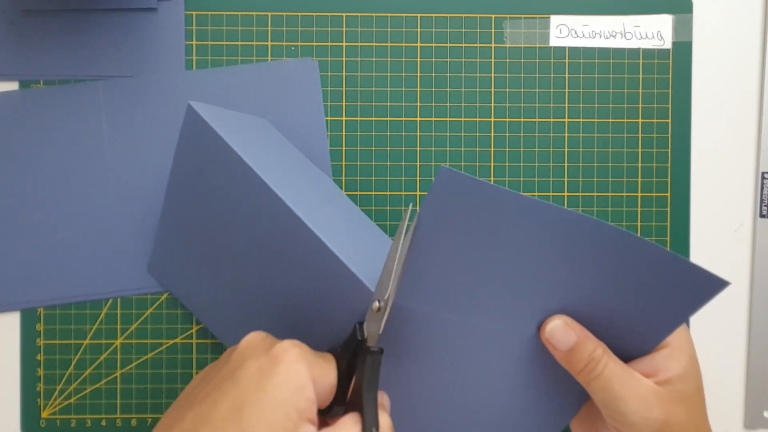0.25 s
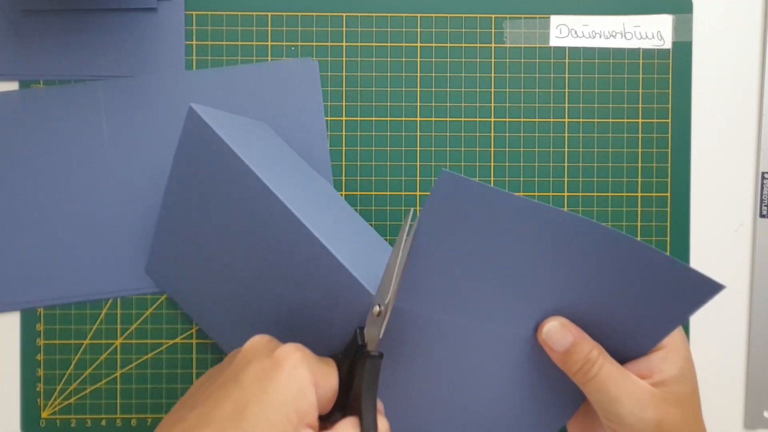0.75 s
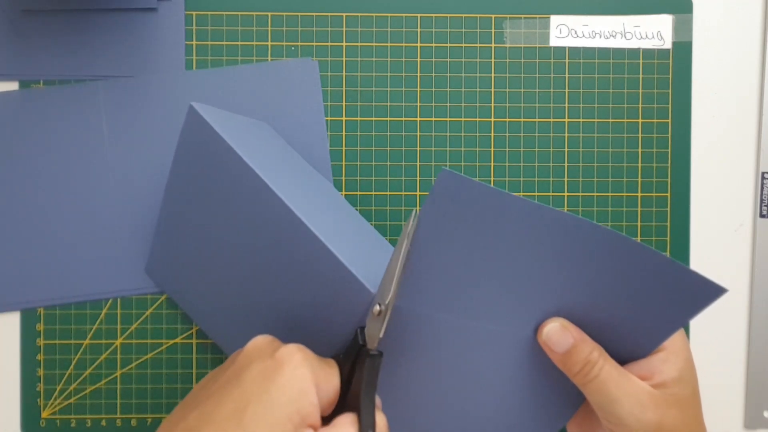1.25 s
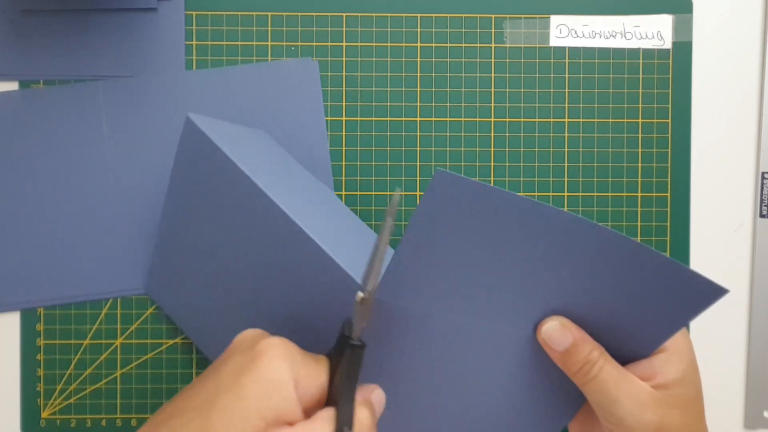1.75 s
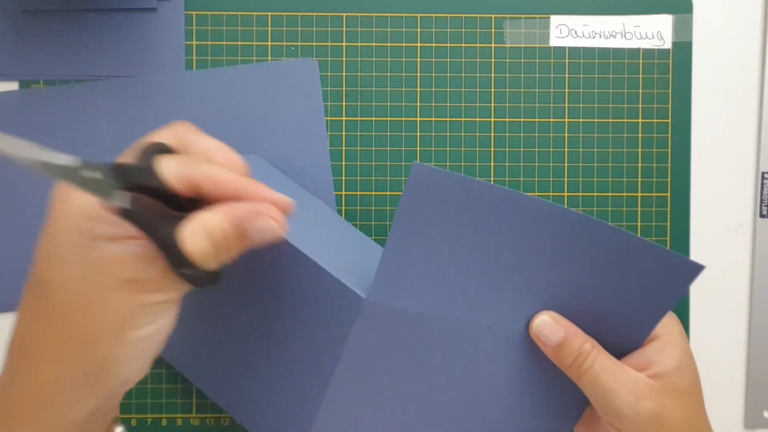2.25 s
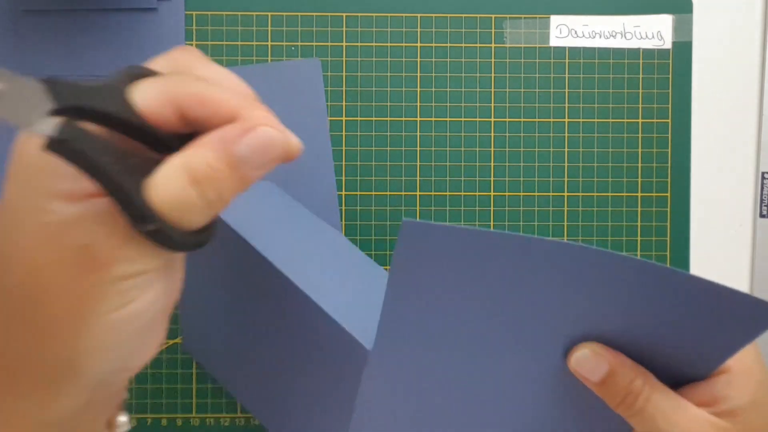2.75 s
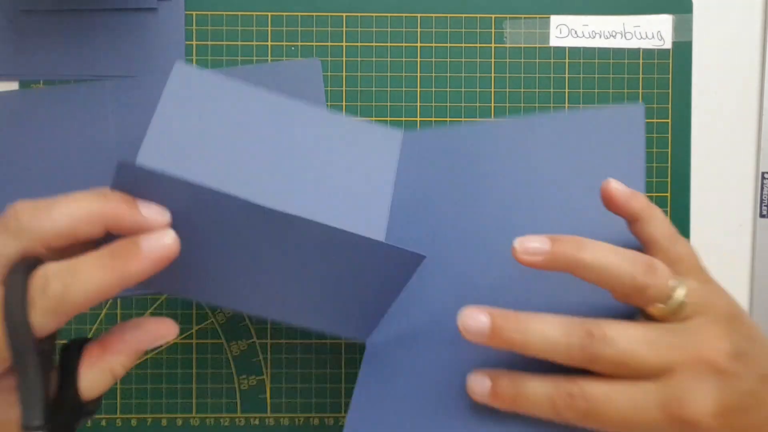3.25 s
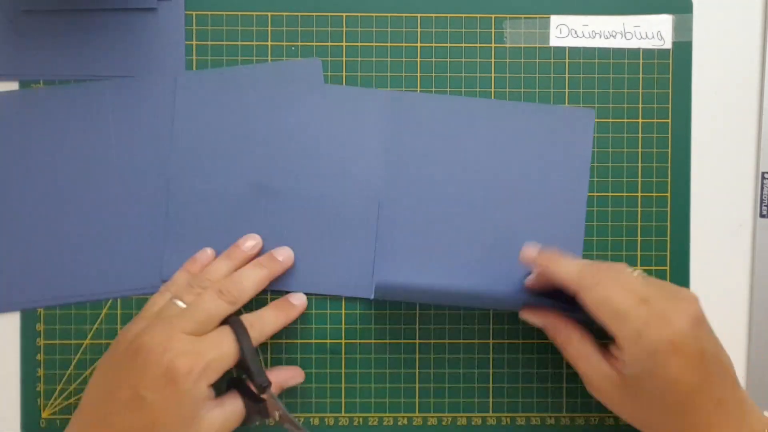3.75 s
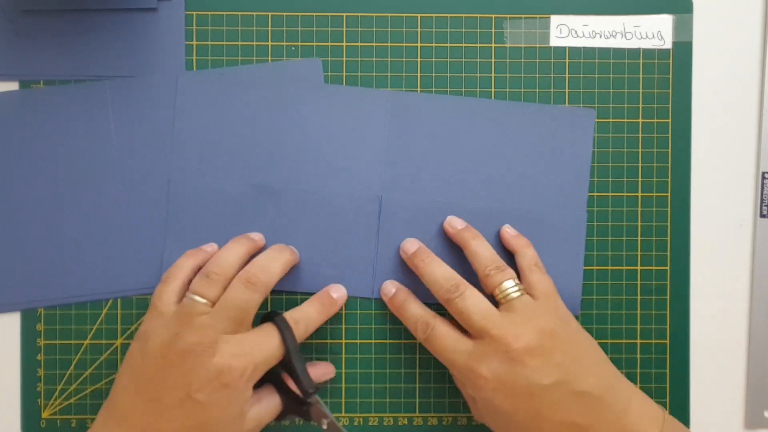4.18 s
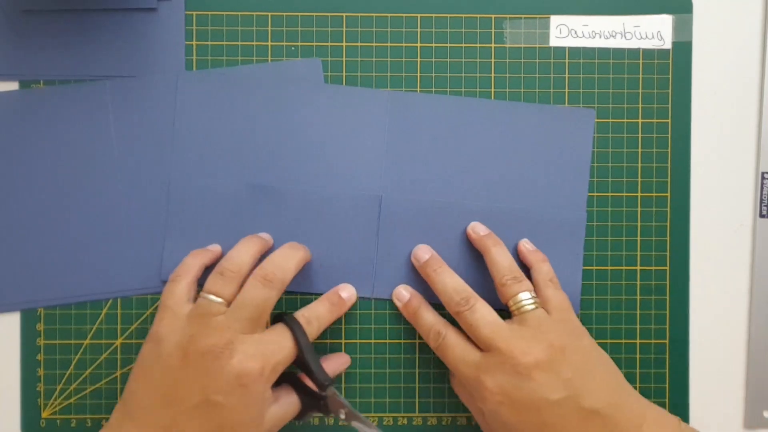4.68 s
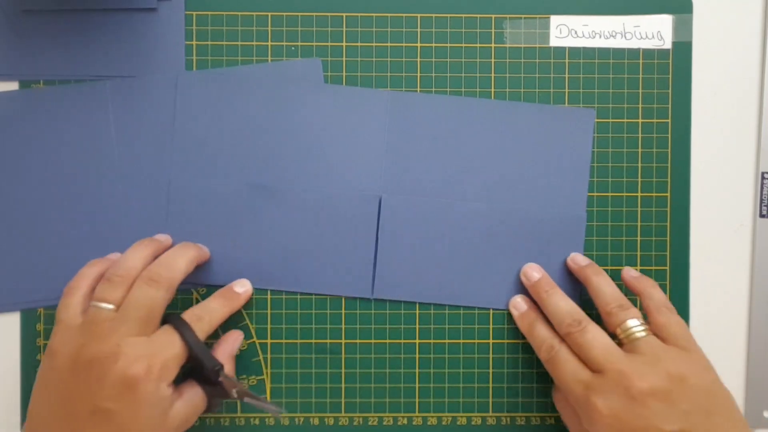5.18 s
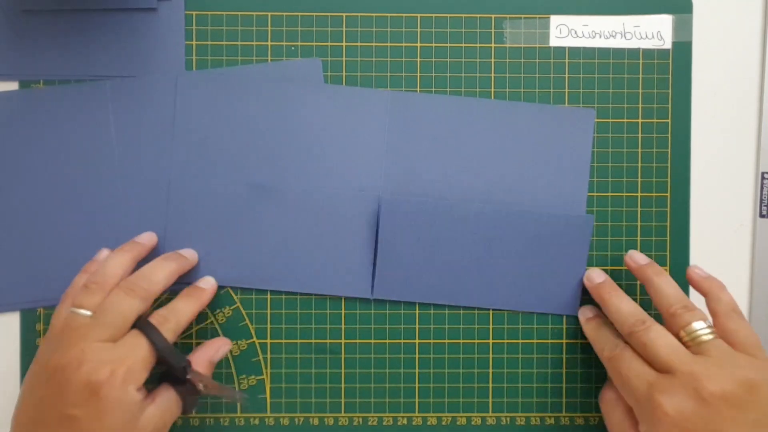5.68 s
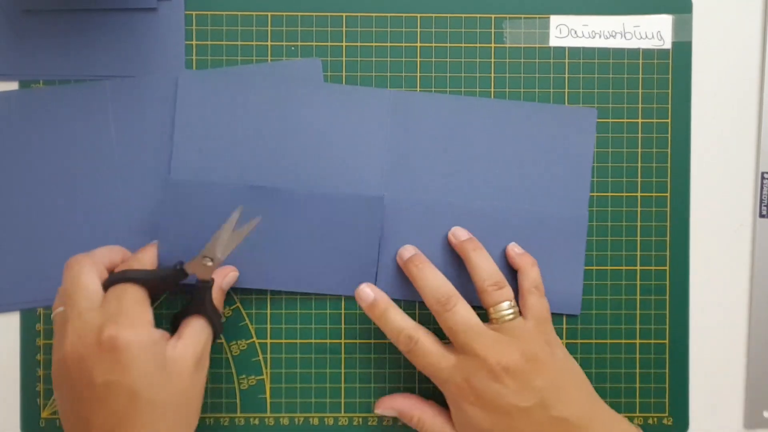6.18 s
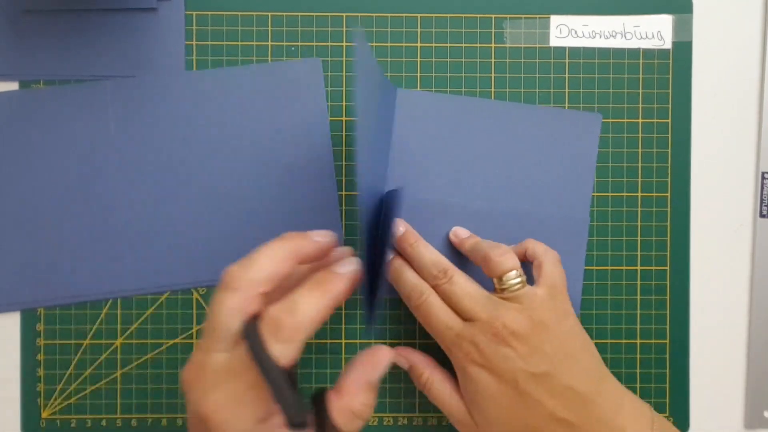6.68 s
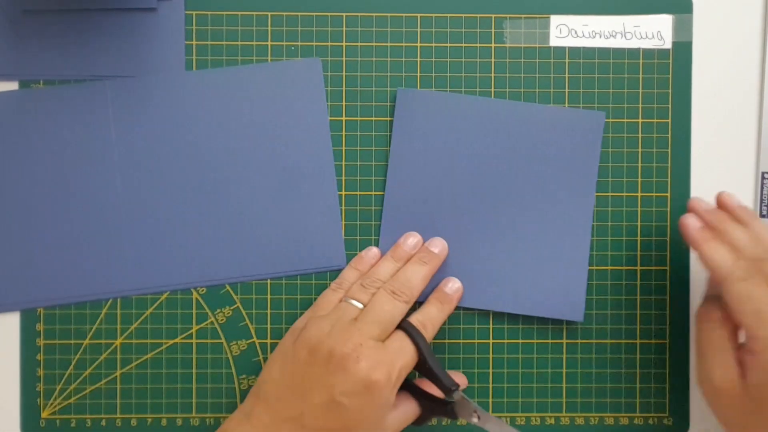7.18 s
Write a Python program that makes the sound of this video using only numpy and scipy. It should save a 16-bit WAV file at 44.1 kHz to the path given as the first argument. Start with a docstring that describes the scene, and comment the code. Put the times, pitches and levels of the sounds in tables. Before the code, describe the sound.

Close on a craft table in a small quiet room, scissors make faint fibrous crunches through stiff card, growing firmer before the blades click shut. Light steel grating and paper flutter follow, then the card slaps loudly onto the mat. Hands slide, flick and press it with dry rustles and soft thumps, and near the end a metal edge clinks as the sheet is turned over.

```python
"""A craft table in a small room: scissors finish a cut through folded cardstock, fibre by fibre.
The blades click shut and are swung aside. The card is unfolded, slaps down on the cutting mat,
and is slid, flicked and pressed flat by hand; near the end a metal edge clinks as the sheet is folded over.
Breaks and rubbing are shaped noise, the slap is one pulse; card, steel and table ring as damped resonances.
Knocks, breaks and catching grains are heard with close reflections and the room's short echo;
fine rubbing noise and the steel's ring stay dry."""
import sys
import numpy as np
from scipy import signal
from scipy.fft import rfft, irfft, next_fast_len
from scipy.io import wavfile
from scipy.ndimage import map_coordinates

SR = 44100
rng = np.random.default_rng(int(sys.argv[2]) if len(sys.argv) > 2 else 0)


def generate_wav(sig):
    """Save sig (samples, or channels by samples) to the path in sys.argv[1] as 16-bit PCM at SR."""
    pcm = np.round(np.clip(np.atleast_2d(sig).T, -1, 1) * 32767).astype(np.int16)
    wavfile.write(sys.argv[1], SR, pcm)


N = 327657  # samples in the whole scene
SIZE = 16384  # samples in one short sound or response
HZ = np.fft.rfftfreq(SIZE, 1 / SR)
T = np.arange(SIZE) / SR
LEAD_IN = 0.03  # seconds from the start of a short sound to its strongest moment

# resonances of the sheet: f/Hz, width/Hz, level/dB
SHEET_MODES = [(870, 26, -15), (1015, 64, 0.5), (1142, 24, -5), (1309, 22, 4), (1426, 32, 0),
               (1700, 80, -5.5), (1897, 40, -4), (2063, 39, 2), (2314, 71, 2.5), (2730, 38, 3)]
# resonances of the cut flap of card: f/Hz, width/Hz, level/dB
FLAP_MODES = [(790, 127, 4.5), (1045, 340, 4.5), (1878, 96, 4.5), (2240, 100, -1)]
# colour of the cutting sound: f/Hz, level/dB
CUT_COLOUR = [(88, -16), (150, -20), (226, -11.5), (483, -8), (699, -14.5), (817, -12), (1380, -16),
              (1930, -10.5), (3020, -15.5), (4540, -18), (9340, -24), (13000, -27.5), (15800, -38)]


def amp(db):
    """Turn decibels into a gain."""
    return 10 ** (np.asarray(db) / 20)


def unit(x):
    """Scale a signal to an average (rms) strength of 1."""
    return x / np.sqrt(np.mean(x ** 2) + 1e-20)


def along(points, hz):
    """Read a curve of (frequency, value) points on a log frequency axis."""
    f, v = np.transpose(points)
    return np.interp(np.log(hz + 1), np.log(f + 1), v)


def level(points):
    """Gain along (time, dB) points, silent outside them."""
    return amp(np.interp(np.arange(N) / SR, *np.transpose(points), left=-np.inf, right=-np.inf))


def filtered(x, response):
    """Multiply the spectrum of x by a response that depends on frequency."""
    n = x.shape[-1]
    m = next_fast_len(n + SIZE)
    spectrum = rfft(x, m) * response(np.fft.rfftfreq(m, 1 / SR))
    return irfft(spectrum, m)[..., :n]


def causal(gain):
    """The minimum-phase response with this gain: it reacts at once and never before its cause."""
    c = irfft(np.log(np.maximum(gain, 1e-6)))
    c[1:SIZE // 2] *= 2
    c[SIZE // 2 + 1:] = 0
    return np.exp(rfft(c))


def resonances(modes, f):
    """Response of damped modes, each a peak with its own centre, width and level."""
    return sum(amp(db) * 1j * f * w / (c * c - f * f + 1j * f * w) for c, w, db in modes)


def brightened(tone, treble_db):
    """A colour with its treble tilted up or down."""
    share = along([(2000, 0.015), (5000, 0.59), (14000, 0.96)], HZ)  # how much of the tilt each frequency gets
    return amp(along(tone, HZ) + treble_db * share)


def wobble(rate):
    """A smooth random curve through this many random points a second."""
    knots = rng.standard_normal(int(N * rate / SR) + 4)
    return map_coordinates(knots, [np.arange(N) * rate / SR])


def spread(pair):
    """Two unrelated signals become left and right, alike in the bass."""
    # likeness of left and right, 1 = identical: f/Hz, likeness
    likeness = [(60, 0.93), (250, 0.82), (700, 0.53), (1400, 0.34), (3000, 0.089), (15000, 0)]

    def mid_and_side(hz):
        angle = np.arccos(np.clip(along(likeness, hz), -1, 1)) / 2
        return np.array([np.cos(angle), np.sin(angle)])

    mid, side = filtered(pair, mid_and_side)
    return np.array([mid + side, mid - side])


def add(track, s, sound):
    """Mix a sound in at time s."""
    part = track[:, max(round(s * SR), 0):][:, :sound.shape[-1]]
    part += sound[..., :part.shape[1]]


def room(early_db, tail_db, early_t60=0.025, left_lead=.00013):
    """Response of one path to both ears: direct sound (left first), desk reflections, echo from the walls."""
    # time the echo takes to fall 60 dB: f/Hz, t60/s
    echo_times = [(120, 0.3), (1200, 0.14), (5000, 0.13), (15000, 0.094)]
    early = spread(rng.standard_normal((2, SIZE)) ** 3) * amp(-60 * T / early_t60) * (T > .0007)
    hz, t, z = signal.stft(spread(rng.standard_normal((2, SIZE))), SR, nperseg=256)
    decay = amp(-60 * t / along(echo_times, hz)[:, None])
    tail = signal.istft(z * decay, SR, nperseg=256)[1][:, :SIZE]
    tail = tail * (1 - np.exp(-T / 0.0074))  # the echo builds up gradually
    direct = np.exp(-2j * np.pi * HZ * np.array([[0], [round(left_lead * SR) / SR]]))
    return direct + rfft(amp(early_db) * unit(early) + amp(tail_db) * unit(tail)) / np.sqrt(SIZE)


def crackle(colour, length, density, scuff_db, rise, break_db):
    """A grainy burst of energy 1: it swells quickly to one main break, then dies away."""
    length = np.clip(length, .001, .03)
    since = T - LEAD_IN
    envelope = np.exp(-np.abs(since) / np.where(since < 0, rise * length, length))
    grains = (rng.random(SIZE) < density / SR) * rng.uniform(-2.07, 2.2, SIZE)
    burst = (grains + amp(scuff_db) * rng.standard_normal(SIZE)) * envelope
    burst[round(LEAD_IN * SR)] += amp(break_db)
    spectrum = rfft(burst) * causal(colour)
    return spectrum / np.linalg.norm(irfft(spectrum))


def friction(tone, grain_db, density, ring_db, modes=SHEET_MODES):
    """Rubbing of rms 1: dry fine noise and catching grains in the room, coloured by a tone curve and resonances."""
    grains = (rng.random(N) < density / SR) * rng.standard_normal(N)
    path = irfft(room(early_db=2.0, tail_db=-4.0))
    grains = signal.fftconvolve(unit(grains)[None], path, axes=1)[:, :N]
    drive = spread(rng.standard_normal((2, N))) + amp(grain_db) * grains
    return unit(filtered(drive, lambda hz: amp(along(tone, hz)) * (1 + amp(ring_db) * resonances(modes, hz))))


def ambience(rms_db=-62.5):
    """Quiet steady air of the room: coloured noise, more alike left and right in the bass."""
    # colour of the air: f/Hz, level/dB
    air_colour = [(12, -33), (20, 0.5), (95, -6), (130, -7.5), (230, -10), (305, -7.5), (443, -22.5),
                  (996, -18.5), (1470, -24.5), (1650, -21), (2120, -27.5), (2300, -24), (3700, -30),
                  (9300, -40), (13700, -32.5), (15800, -31)]
    air = spread(rng.standard_normal((2, N)))
    return amp(rms_db) * unit(filtered(air, lambda hz: amp(along(air_colour, hz))))


def thumps(gain_db=16, width=1.0):
    """Hands and sheet land softly and ring the table; the shorter the contact, the higher the modes it reaches."""
    # landings: t/s, level/dB before the gain, centre of the knock f/Hz
    landings = [(1.883, -38, 101), (2.428, -35.5, 121), (2.548, -38.5, 200), (2.618, -35, 143),
                (2.63, -41, 148), (3.212, -36.5, 128), (3.238, -31, 101), (3.397, -23.5, 245),
                (3.411, -30.5, 85), (3.438, -28.5, 114), (3.804, -27.5, 109), (3.876, -37, 160),
                (3.934, -34, 483), (3.973, -37, 150), (4.136, -37, 159), (4.672, -44.5, 177),
                (4.707, -43.5, 182), (5.439, -40.5, 195), (5.973, -38, 230), (6.324, -36.5, 96),
                (6.424, -41, 175), (6.698, -39.5, 152), (7.13, -36.5, 310), (7.145, -33, 146)]
    # resonances of the table top and mat: f/Hz, width/Hz, level/dB
    table_modes = [(56, 6.5, 8), (80.5, 32, 4), (117, 17, -2.5), (134.7, 10, 4.5), (194, 20, 1),
                   (230, 52, -11.5), (283, 33, 1.5), (372, 26, 0), (516, 57, -32.5)]
    out = np.zeros((2, N))
    for s, db, hz in landings:
        contact = resonances([(hz, width * hz, 0)], HZ) ** 2
        push = resonances(table_modes, HZ) * contact
        push = push / np.linalg.norm(irfft(push))
        add(out, s - .003, amp(db + gain_db) * irfft(push * room(early_db=-11.0, tail_db=-9.0)))
    return out


def strokes():
    """Flutter, rub and hiss gains: every stroke swells as the hand speeds up and fades as it slows."""
    # pushes and turns of the card: fastest t/s, speeding up/s, slowing down/s, rub level/dB, hiss over rub/dB
    pushes = [(1.781, 0.074, 0.15, -61.5, -3), (1.96, 0.22, 0.1, -70, -14), (2.15, 0.092, 0.34, -73.5, 6.5),
              (2.38, 0.075, 0.087, -64, 5.5), (2.64, 0.063, 0.033, -56, 2.5),
              (2.8, 0.52, 0.52, -64.5, -7.5), (3.23, 0.043, 0.097, -52.5, -3.5),
              (3.47, 0.064, 0.06, -45.5, 0), (3.62, 0.079, 0.11, -58.5, -4.5), (3.81, 0.18, 0.14, -54, 3.5),
              (4.15, 0.055, 0.094, -54.5, 2), (4.339, 0.018, 0.11, -67, 2), (4.73, 0.082, 0.74, -60.5, 0.5),
              (5.021, 0.23, 0.28, -65, 4), (5.44, 0.19, 0.2, -61, -6), (5.729, 0.044, 0.079, -59, -4.5),
              (6.11, 0.25, 0.27, -58, -7), (6.35, 0.099, 0.41, -65, -1), (6.87, 0.088, 0.15, -65, -4),
              (7.11, 0.25, 0.09, -57.5, 7.5)]
    fade_db, roundness = 8, 1.68  # drop one speeding-up or slowing-down time from the peak; shape of the swell
    flutter_db, flutter_per_hiss = -6.5, -0.82  # a sheet lying flat hisses, a lifted one flutters instead
    t = np.arange(N) / SR
    power = np.zeros((3, N))
    for s, rise, fall, db, hiss_db in pushes:
        away = np.abs((t - s) / np.where(t < s, rise, fall))
        swell = amp(db - np.minimum(fade_db * away ** roundness, 100))
        shares = amp([[flutter_db + flutter_per_hiss * hiss_db], [0], [hiss_db]])
        power += (shares * swell) ** 2
    return np.sqrt(power)


def sliding():
    """The card drags over the mat under uneven pressure, catches now and then, and flutters as it bends."""
    # colours of the three layers: f/Hz, level/dB
    flutter_colour = [(26, -45), (45, -3), (113, -9), (231, -12.5), (297, -7), (443, -14), (600, -12.5),
                      (780, -33), (1320, -120)]
    rub_colour = [(240, -62.5), (400, -3.5), (722, 0.5), (1010, -3), (1230, 2), (1480, -0.5), (3130, -3.5),
                  (3380, -8.5), (3660, -2), (4200, -13), (5460, -28.5), (9240, -120)]
    hiss_colour = [(1940, -18.5), (3300, -3.5), (3640, -8.5), (4180, -3), (7150, -6.5), (8050, -5),
                   (9540, -10), (15200, -11), (15800, -28)]
    catches_per_s, catch_db, catch_s = 22, 0.5, 0.026  # random catches: rate, swell, dying-away time
    flutter, rub, hiss = strokes()
    grip = np.sqrt(rub / rub.max())  # firm strokes catch harder
    starts = 1. * (rng.random(N) < catches_per_s / SR)
    catches = signal.fftconvolve(starts, np.exp(-T / catch_s))[:N]
    pressure_db = 1.1 * wobble(45) + catch_db * grip * catches
    flutter = flutter * amp(pressure_db) * friction(flutter_colour, grain_db=-12.0, density=15, ring_db=-6.0)
    rub = rub * amp(pressure_db) * friction(rub_colour, grain_db=-3, density=250, ring_db=-2)
    hiss = hiss * amp(pressure_db / 2) * friction(hiss_colour, grain_db=-10.5, density=450, ring_db=-26.0)
    return flutter + rub + hiss


def scuffs(gain_db=-3, smooth_db=-25, slips_per_s=500):
    """An edge stutters over the paper's grain; its pitch glides as the free length of card changes."""
    # edges and fingertips scraping: strongest t/s, level/dB before the gain, pitch f/Hz,
    # glide/(octaves per s), band width/pitch, length/s
    scrapes = [(2.37, -46.5, 760, -6, 1.7, 0.024), (2.521, -58, 475, -2, 1.3, 0.15),
               (2.646, -58.5, 850, 2, 0.53, 0.022), (3.006, -51, 920, -2, 0.84, 0.021),
               (3.587, -47, 2500, 8, 0.48, 0.047), (4.103, -43.5, 2820, -5, 0.19, 0.011),
               (4.148, -47, 2380, -4, 0.78, 0.033), (5.018, -64, 2220, -1, 0.22, 0.18),
               (5.149, -64, 1325, 0, 0.03, 0.28), (6.029, -49, 1800, -11, 0.73, 0.023),
               (6.098, -49.5, 1790, -3, 0.41, 0.023), (6.284, -54, 1780, 6, 0.38, 0.039),
               (6.427, -58.5, 3130, 4, 0.33, 0.032), (6.605, -58, 3730, 34, 0.91, 0.031),
               (7.122, -47, 1960, 0, 0.15, 0.028)]
    out = np.zeros((2, N))
    t = np.arange(SR) / SR - .5
    for s, db, hz, glide, width, length in scrapes:
        slips = (rng.random(SR) < slips_per_s / SR) * rng.standard_normal(SR)
        slips = slips + amp(smooth_db) * rng.standard_normal(SR)
        f, when, z = signal.stft(slips, SR, nperseg=512)
        centre = hz * 2 ** (glide * np.clip(when - .5, -2 * length, 2 * length))
        band = np.abs(resonances([(centre, width * centre, 0)], f[:, None])) / np.sqrt(centre)
        rasp = unit(signal.istft(z * band, nperseg=512)[1][:SR]) * np.exp(-(t / length) ** 2)
        path = irfft(room(early_db=3.0, tail_db=-5.0))
        add(out, s - .5, amp(db + gain_db) * signal.fftconvolve(rasp[None], path, axes=1))
    return out


def clink(crack_db=19, left_db=2.0):
    """Steel touches down with a bright crack; the hand damps its ring."""
    # metal touching down: t/s, level/dB of the ring (the crack gets a further gain)
    touches = [(7.126, -38)]
    # ringing modes of the steel: f/Hz, level/dB, time to fall 60 dB/s
    steel_modes = [(4900, 4.5, 0.049), (5300, -6.5, 0.049), (8130, -3, 0.18), (9900, -17, 0.18)]
    # colour of the crack: f/Hz, level/dB
    crack_colour = [(1000, -24), (4000, -24), (5400, 1), (9000, -1), (12500, 15), (15800, -8)]
    out = np.zeros((2, N))
    for s, db in touches:
        crack = crackle(amp(along(crack_colour, HZ)), length=0.002, density=1700, scuff_db=-9,
                        rise=0.45, break_db=7)
        add(out, s - LEAD_IN, amp(db + crack_db) * irfft(crack * room(early_db=8.5, tail_db=2)))
        for hz, mode_db, t60 in steel_modes:
            drift = np.cumsum(rng.normal(0, .12, (2, SIZE)), axis=1)  # roughens the pure tone
            phase = rng.uniform(0, 2 * np.pi, (2, 1)) + drift
            add(out, s, amp(db + mode_db - 60 * T / t60) * np.sin(2 * np.pi * hz * T + phase))
    return out * amp([[left_db], [-left_db]])


def taps(gain_db=13, width=0.69):
    """A soft contact knocks a panel of card and chatters briefly: a sudden, dull note."""
    # corners and fingertips tapping the loose card: t/s, level/dB before the gain, panel pitch f/Hz
    contacts = [(2.488, -44, 790), (2.547, -42, 950), (2.615, -44.5, 1280), (3.076, -45.5, 1390),
                (3.093, -39, 610), (3.354, -26, 680), (5.299, -43, 1350), (5.377, -29, 185),
                (6.698, -42, 1250)]
    out = np.zeros((2, N))
    for s, db, hz in contacts:
        panel = np.abs(resonances([(hz, width * hz, 0)], HZ)) ** 2
        knock = crackle(panel, length=0.008, density=1500, scuff_db=-20, rise=0.1, break_db=14)
        add(out, s - LEAD_IN, amp(db + gain_db) * irfft(knock * room(early_db=-5.5, tail_db=-11)))
    return out


def flicks(gain_db=8, usual_treble_db=-14, panel_db=13, damping=0.07, bass_share=0.24):
    """Stiff edges catch and let go; each sets its own patch of card ringing, and a small patch gives little bass."""
    # card edges and fingernails striking the sheet: t/s, level/dB before the gain,
    # treble/dB (compared with the usual), length/s (raised to 0.001 if shorter), panel pitch f/Hz
    strikes = [(2.144, -44.5, 2, 0.001, 9200), (2.433, -31.5, -28, 0.0077, 800),
               (2.671, -32.5, -32, 0.0037, 1580), (2.934, -38, -29, 0.012, 1740),
               (3.094, -35, -10, 0.0026, 634), (3.433, -23, -29, 0.0052, 3500),
               (3.618, -28, -16, 0.0054, 3480), (3.797, -18.5, -14, 0.011, 1620),
               (3.874, -20, -29.5, 0.0077, 776), (3.903, -18.5, -22, 0.0041, 4980),
               (3.936, -23, -25, 0.0078, 2700), (3.967, -30.5, -15, 0.011, 573),
               (4.152, -30, -23, 0.0029, 2400), (5.383, -36.5, -45, 0.0017, 1290),
               (5.462, -38, -24, 0.003, 2220), (5.977, -35, -27.5, 0.005, 1550),
               (6.008, -22.5, -28.5, 0.00085, 2020), (6.044, -34, -32, 0.001, 1890),
               (6.0672, -24, -28, 0.001, 2620), (6.077, -29.5, -32, 0.002, 1710),
               (6.34, -39, -30, 0.0033, 1640), (6.699, -29.5, -20.5, 0.0074, 3560),
               (7.1287, -16.5, -5, 0.0037, 5530), (7.169, -29, -1, 0.0067, 5350)]
    # colour they share: f/Hz, level/dB
    flick_colour = [(120, -28.5), (200, -5.5), (290, 2), (400, -11), (520, -5), (720, -8), (1020, -8),
                    (1470, -8.5), (4160, -6.5), (4990, -8.5), (15800, -20.5)]
    out = np.zeros((2, N))
    for s, db, treble_db, length, hz in strikes:
        panel = np.abs(1.5 + resonances([(hz, damping * hz, panel_db)], HZ))
        bass_loss = HZ / np.hypot(HZ, bass_share * hz)
        colour = brightened(flick_colour, treble_db - usual_treble_db) * panel * bass_loss
        tick = crackle(colour, length, density=1600, scuff_db=-18.5, rise=0.69, break_db=7)
        path = room(early_db=4, tail_db=-3.5, early_t60=0.014)
        add(out, s - LEAD_IN, amp(db + gain_db) * irfft(tick * path))
    return out


def slap(gain_db=5, ring_db=1, left_db=0.7):
    """Air squeezed from under the falling sheet makes one rounded pulse; the sheet rebounds and rings."""
    # the sheet falling flat: t/s, level/dB before the gain
    falls = [(3.3945, -4.5)]
    # its rebounds and nearby surfaces: delay/s, level/dB
    rebounds = [(.0011, -13), (.0026, -15), (.007, -11), (.0104, -14), (.022, -19), (.028, -17)]
    # colour of the pulse: f/Hz, level/dB
    slap_colour = [(60, -33.5), (250, -26), (550, -8.5), (1000, 0.5), (1450, 4), (2200, -2), (2900, -8),
                   (4200, -25), (8000, -32.5), (15800, -43.5)]
    out = np.zeros((2, N))
    pulse = amp(along(slap_colour, HZ)) * np.exp(-2j * np.pi * HZ * LEAD_IN)
    pulse = pulse / np.linalg.norm(irfft(pulse))
    again = 0
    for delay, db in rebounds:
        arrival = delay + rng.normal(0, .00006, (2, 1))  # slightly different left and right
        again = again + amp(db) * np.exp(-2j * np.pi * HZ * arrival)
    ring = amp(ring_db) * resonances(SHEET_MODES, HZ)
    for s, db in falls:
        paths = room(early_db=2.0, tail_db=-1.0, left_lead=0) + again + ring
        add(out, s - LEAD_IN, amp(db + gain_db) * irfft(pulse * paths))
    return out * amp([[left_db], [-left_db]])


def blades(ring_db=25):
    """Out of the card, the scissors click shut, then grate at the pivot as they are swung round; the steel rings."""
    # the scissors swinging round in the fingers: t/s, level/dB
    swing = [(2.04, -76), (2.13, -63), (2.22, -75), (2.27, -54), (2.4, -58), (2.5, -62.5), (2.66, -65),
             (2.72, -72)]
    # the blades falling shut: t/s, level/dB
    closings = [(1.902, -23.5)]
    # resonances of the scissors: f/Hz, width/Hz, level/dB before the ring gain
    blade_modes = [(665, 32, -9), (1026, 30, -9.5), (1530, 31, -3.5), (2875, 59, -7.5), (3737, 59, -4.5),
                   (4760, 60, -10), (5510, 38, -10)]
    out = level(swing) * friction(CUT_COLOUR, grain_db=5, density=130, ring_db=ring_db, modes=blade_modes)
    colour = amp(along(CUT_COLOUR, HZ)) * np.abs(1 + amp(ring_db) * resonances(blade_modes, HZ))
    for s, db in closings:
        click = crackle(colour, length=.003, density=1400, scuff_db=-20, rise=.4, break_db=10)
        add(out, s - LEAD_IN, amp(db) * irfft(click * room(early_db=3.0, tail_db=-23)))
    return out


def blade_drag(ring_db=4):
    """While the cut lasts, the card drags along the blades and crunches softly between them."""
    # loudness of the drag: t/s, level/dB
    drag = [(0, -78), (.06, -63.5), (.15, -58.5), (.2, -67), (.4, -70.5), (.44, -58.5), (.49, -64),
            (.55, -69), (.95, -76), (1.5, -86), (1.75, -59.5)]
    return level(drag) * friction(CUT_COLOUR, grain_db=0, density=220, ring_db=ring_db, modes=FLAP_MODES)


def scissors(gain_db=11, usual_treble_db=-17, crunch_s=0.012):
    """The closing blades shear the card in short, fine-grained crunches that ring the cut flap."""
    # blades breaking through the card: t/s, level/dB before the gain, treble/dB (compared with the usual)
    cuts = [(0.051, -46.5, -17), (0.32, -51.5, -19), (0.483, -47.5, -22), (0.527, -53, -12),
            (0.902, -46, -21), (0.935, -52.5, -13), (0.982, -44.5, -15), (1.006, -44, -12),
            (1.041, -49, -15), (1.063, -46, -12), (1.146, -44.5, -4.5), (1.199, -45, -17),
            (1.31, -42.5, -12), (1.392, -47.5, -28), (1.414, -55, -6), (1.437, -47, -7),
            (1.504, -53.5, -17), (1.554, -32.5, -11.5), (1.58, -29.5, -17.5), (1.734, -28.5, -24),
            (1.75, -30.5, -20)]
    out = np.zeros((2, N))
    flap_ring = np.abs(1 + resonances(FLAP_MODES, HZ))
    for s, db, treble_db in cuts:
        colour = flap_ring * brightened(CUT_COLOUR, treble_db - usual_treble_db)
        crunch = crackle(colour, crunch_s, density=2600, scuff_db=-12.5, rise=0.39, break_db=14)
        add(out, s - LEAD_IN, amp(db + gain_db) * irfft(crunch * room(early_db=4.5, tail_db=-8.5)))
    return out


def scene():
    """All the handling, a little to the left, over the room's air."""
    # left minus right: f/Hz, level/dB
    left_lean = [(200, 0), (1100, 1), (4000, 0.5), (8000, 1), (13000, 3.5)]
    cutting = scissors() + blade_drag() + blades()
    handling = flicks() + taps() + scuffs() + slap() + thumps() + clink() + sliding()
    half_each = np.array([[.5], [-.5]])
    work = filtered(cutting + handling, lambda hz: amp(half_each * along(left_lean, hz)))
    return work + ambience()


def record(dry, low_hz=36, top_hz=15900):
    """Thin out the deepest rumble and cut off steeply above the top frequency."""
    thin = filtered(dry, lambda hz: hz ** 2 / np.sqrt(hz ** 4 + low_hz ** 4))
    return filtered(thin, lambda hz: 1 / (1 + (hz / top_hz) ** 200))


dry = scene()
out = record(dry)
generate_wav(out)
```